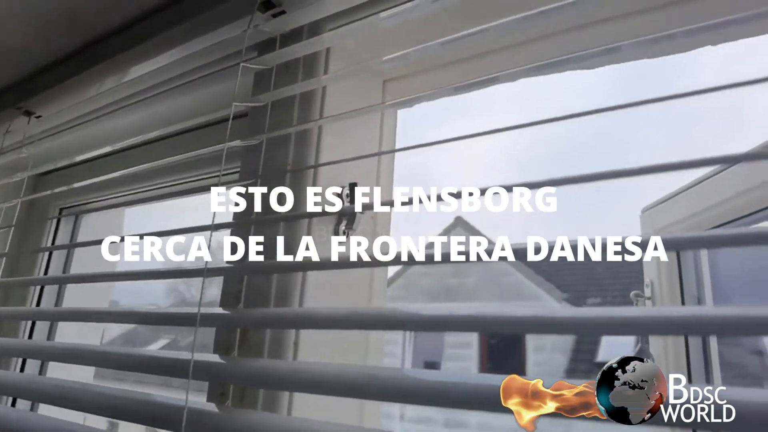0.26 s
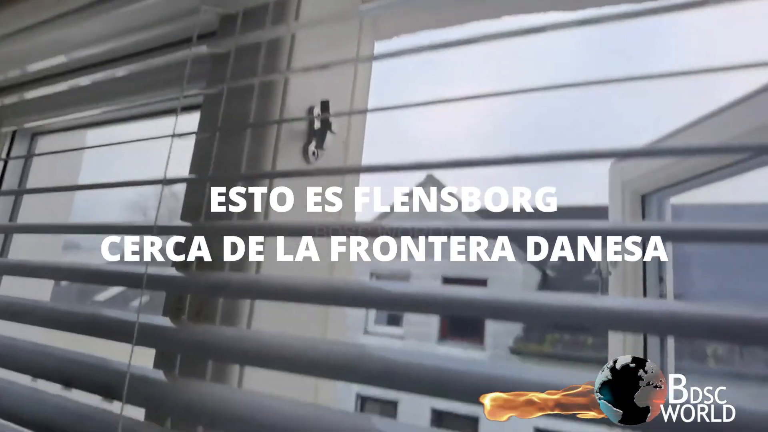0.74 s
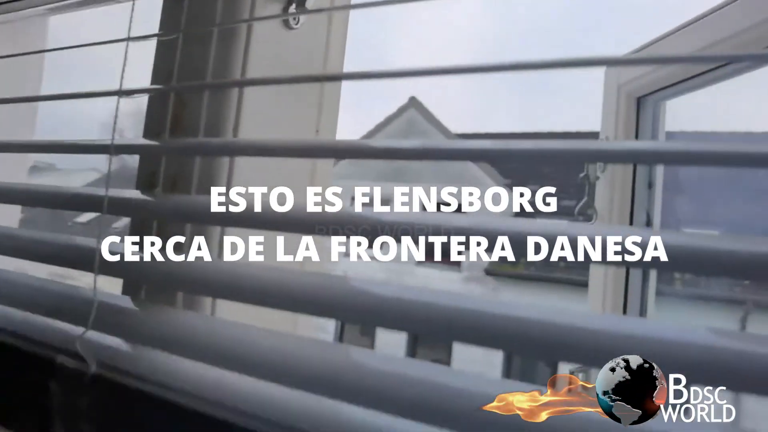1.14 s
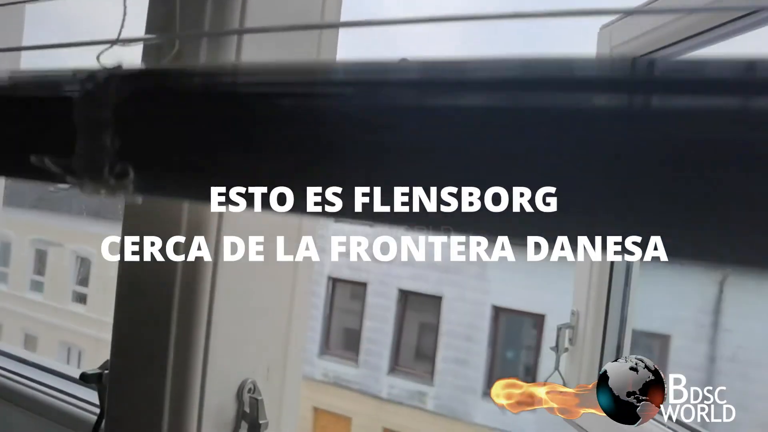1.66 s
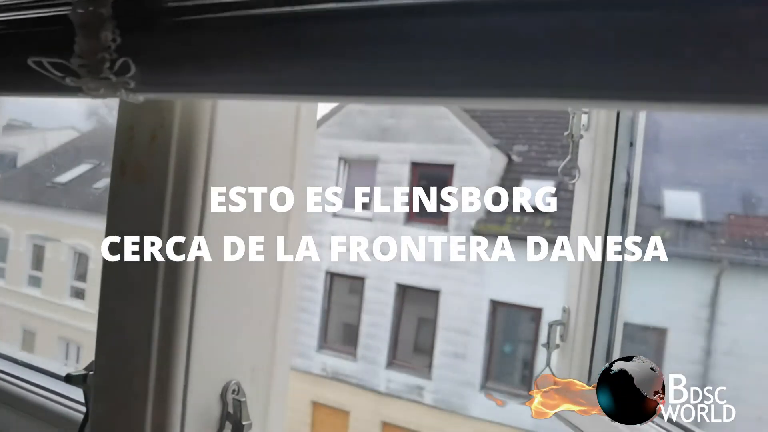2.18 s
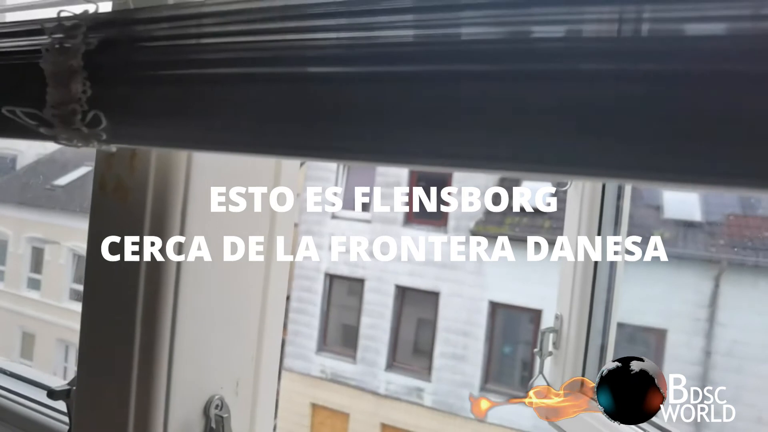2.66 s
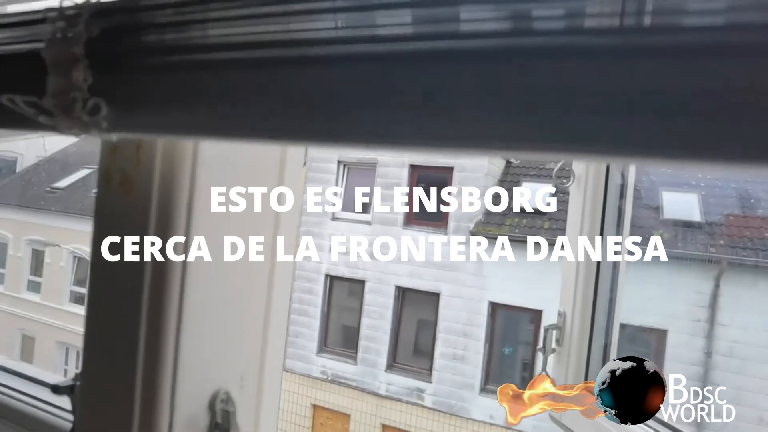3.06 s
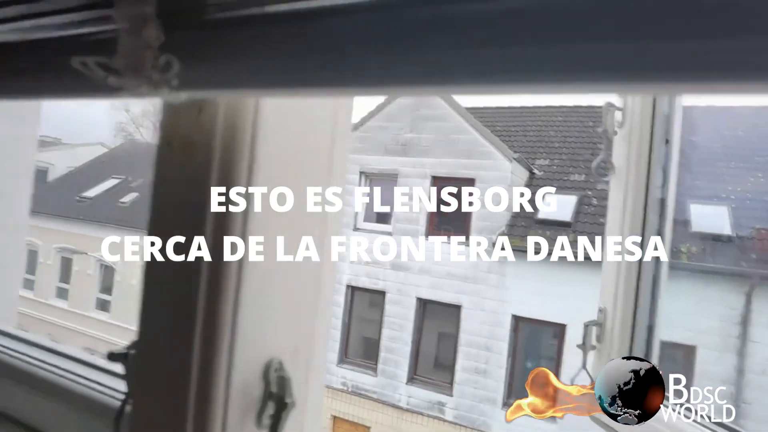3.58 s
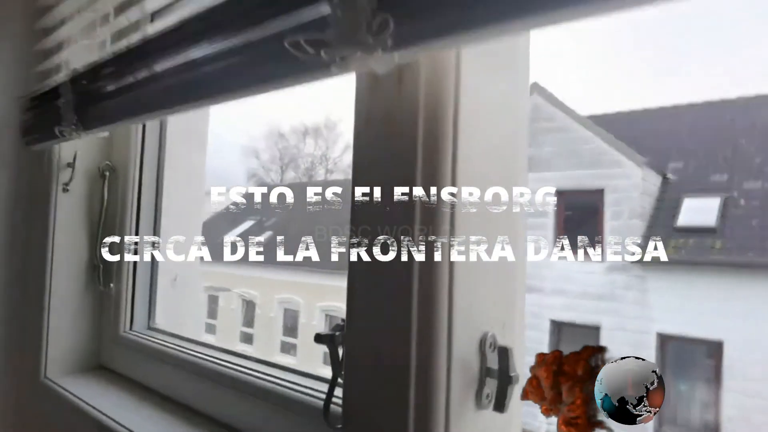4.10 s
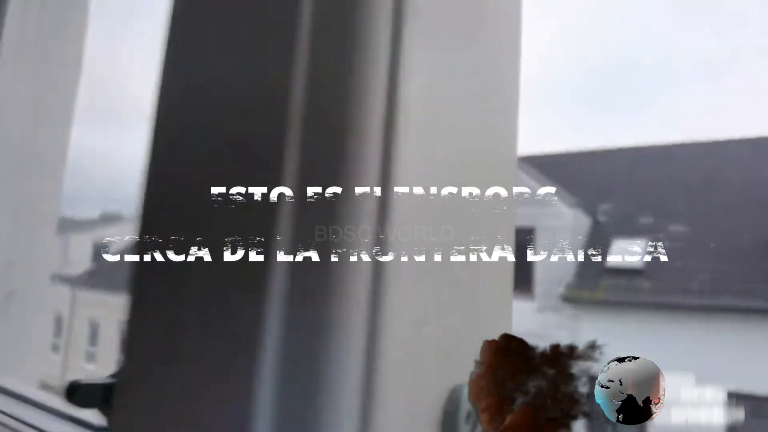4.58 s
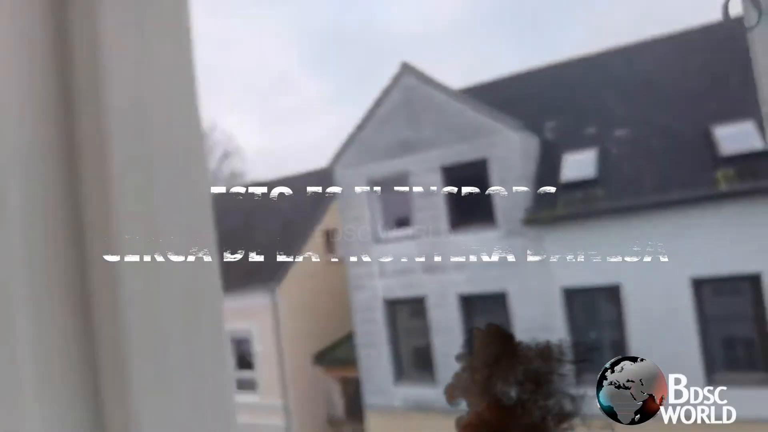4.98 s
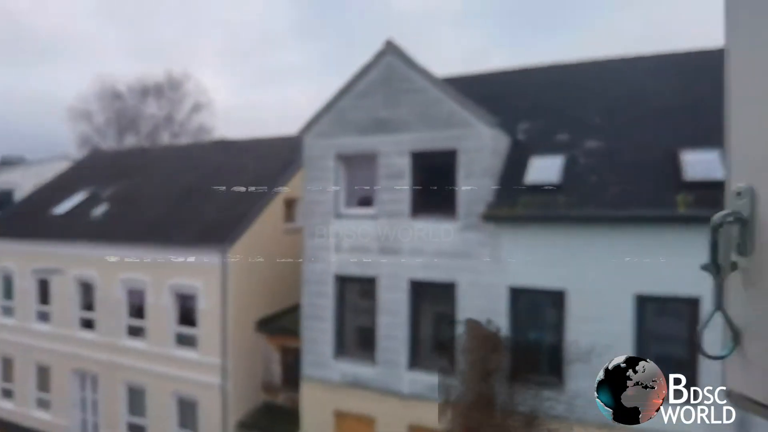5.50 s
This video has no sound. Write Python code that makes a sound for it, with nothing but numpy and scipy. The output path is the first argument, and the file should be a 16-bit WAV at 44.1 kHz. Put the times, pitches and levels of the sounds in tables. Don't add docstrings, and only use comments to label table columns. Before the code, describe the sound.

Inside a room, close to a window, a small stereo microphone with faint hiss picks up a low, deep drone of traffic and an idling motor outside. At about 0.1 s the blind's slat pack is taken up with a soft knock; a rough jolt at 0.35 s starts the pull. Until about 1.7 s the cord hisses brightly while thin slats rustle, tick and clack, with faint squeaks. From 1.75 to 1.9 s the rail clatters home in a tight cluster of sharp, bright hits with short squeaks. From 2.2 to 2.9 s a rapid roll of dull, boxy thuds, around 230 to 360 Hz, rings a wall panel, slightly right. Then mostly hum, with faint ticks near 3.1, 3.6 and 4 s and a light cord brush. Knocks on the frame come at 5.1 and, hardest with a latch snap, 5.27 s; louder thuds and a sill tap close from 5.6 s.

```python
import sys
import numpy as np
from scipy import signal
from scipy.fft import rfft, irfft
from scipy.io import wavfile
from scipy.ndimage import uniform_filter1d

SR = 44100
rng = np.random.default_rng(int(sys.argv[2]) if len(sys.argv) > 2 else 0)


def bounce(signal):
    frames = np.transpose(np.atleast_2d(signal))
    limited = np.clip(frames, -1, 1)
    pcm = np.round(limited * 32767).astype(np.int16)
    wavfile.write(sys.argv[1], SR, pcm)


def ratio_of_db(decibels):
    return 10 ** (np.asarray(decibels, float) / 20)


N = 253420


def rms_one(x):
    return x / np.sqrt(np.mean(x ** 2) + 1e-20)


def peak_one(x):
    return x / np.abs(x.mean(axis=0)).max()


def in_time(rows, outside_db=-120):
    s, *columns = np.transpose(rows)
    return np.array([np.interp(np.arange(N) / SR, s, c, outside_db, outside_db) for c in columns])


def swell(peak, rise, fall):
    late = np.arange(N) / SR - peak
    return ratio_of_db(-20 * np.maximum(late / fall, -late / rise))


def drift(rate):
    r = np.exp(-80 * np.pi * rate / SR)
    slow = signal.lfilter([1], [1, -2 * r, r * r], rng.standard_normal(N // 40 + 2002))[2000:]
    return np.interp(np.arange(N) / 40, np.arange(len(slow)), rms_one(slow))


def resonance(x, hz, width):
    r = np.exp(-np.pi * width / SR)
    zeros = np.array([1, 0, -1]) * (1 - r * r) / 2
    return signal.lfilter(zeros, [1, -2 * r * np.cos(2 * np.pi * hz / SR), r * r], x)


def twice(x, hz, width):
    return resonance(resonance(x, hz, width), hz, 3 * width)


def colour(x, spectrum):
    hz, db = np.transpose(spectrum)
    grid = np.maximum(np.fft.rfftfreq(4096, 1 / SR), 1)
    cepstrum = irfft(np.log(ratio_of_db(np.interp(np.log(grid), np.log(hz), db))))
    cepstrum[1:2048] *= 2
    cepstrum[2049:] = 0
    response = irfft(np.exp(rfft(cepstrum)))
    return signal.oaconvolve(x, response[None], axes=-1)[:, :N]


def dying_noise(t60, seconds, onset=0.00027):
    t = np.arange(int(seconds * SR)) / SR
    noise = rng.standard_normal((2, int(SR / 2)))[:, :len(t)]
    return noise * ratio_of_db(-60 * t / t60) * (1 - np.exp(-t / onset))


def add(out, sound, s):
    i = round(s * SR)
    out[:, i:i + sound.shape[1]] += sound[:, :N - i]


def room(x, t60, cut_hz):
    tail = signal.lfilter(*signal.butter(1, cut_hz, fs=SR), dying_noise(t60, .5, onset=0.00053))
    return signal.oaconvolve(x, tail / np.sqrt(np.sum(tail ** 2) / 2), axes=-1)[:, :N]


def grains(per_s, spread_db, clump_db, t60):
    energy = ratio_of_db(2 * spread_db * np.minimum(rng.exponential(1, N), 5)) * (rng.random(N) < per_s / SR)
    fall = ratio_of_db(-120 / (t60 * SR))
    clumps = ratio_of_db(clump_db * (.5 * drift(10) + drift(45)))
    return clumps * np.sqrt(signal.lfilter([1], [1, -fall], energy + 1e-9)) * rng.standard_normal((2, N))


def patchy(x, low_hz, high_hz, patchy_db, rate):
    edges = np.geomspace(low_hz, high_hz, num=8)
    bands = [signal.sosfilt(signal.butter(2, e, "band", fs=SR, output="sos"), x) for e in zip(edges, edges[1:])]
    return sum((-1) ** k * ratio_of_db(patchy_db * drift(rate)) * band for k, band in enumerate(bands))


# t/s, level/dB
HISS_LEVEL = [(0, -45), (.3, -37.5), (1.9, -40.5), (2.12, -53.5), (2.3, -50.5), (4.7, -48.5), (5.45, -50),
              (5.75, -54.5)]
# f/Hz, level/dB per Hz
HISS_COLOUR = [(600, -30), (1000, -9), (2200, -12), (3000, -11), (4200, -18), (5500, -12.5), (6650, -5),
               (7550, -9), (9550, -2), (10700, -5), (11600, -17), (12800, -12), (14200, -17)]
# f/Hz, width/Hz, level/dB
WHISTLES = [(6500, 40, -4), (6790, 30, 0), (8800, 40, -2), (9090, 30, 0), (9350, 60, 0), (10300, 40, -3),
            (10800, 40, -3), (12700, 60, -8)]


def hiss():
    white = rng.standard_normal((2, N))
    whistles = sum(ratio_of_db(db + 3.5 * drift(1.5)) * rms_one(resonance(white, hz, width))
                   for hz, width, db in WHISTLES)
    body = patchy(colour(white, HISS_COLOUR), 500, 16000, patchy_db=1.5, rate=2)
    return ratio_of_db(in_time(HISS_LEVEL)[0]) * (rms_one(body) + ratio_of_db(-17) * whistles)


# t/s,
# level/dB
MOTOR = [(0.0, -73), (0.13, -33), (0.69, -38), (0.74, -52), (1.2, -27.5), (1.71, -36.5), (1.9, -56),
         (2.05, -38), (3.39, -35.5), (3.57, -53), (3.62, -40), (3.98, -41.5), (4.05, -68), (4.11, -40.5),
         (5.49, -27), (5.75, -32.5)]
# t/s, level/dB
TRAFFIC = [(0.0, -40.5), (0.05, -41), (0.69, -36), (0.74, -38.5), (1.17, -37.5), (1.7, -42.5), (1.84, -57),
           (2.21, -40), (3.15, -37.5), (3.22, -39), (3.44, -39), (3.66, -39.5), (3.71, -36.5), (3.78, -42),
           (5.54, -39.5), (5.75, -46)]
# f/Hz, width/Hz, level/dB
LOW_MODES = [(44.5, 8, -6), (45, 23.3, 19), (86, 8.1, -29)]
UPPER_MODES = [(133, 13, 1), (147, 4.4, 8), (183, 24, -16.5)]
# f/Hz, level/dB per Hz
RUMBLE = [(100, -22.5), (170, 2.5), (198, -0.5), (380, -7), (487, -18), (598, -21.5), (992, -27.5),
          (1180, -35.5), (2000, -36.5), (2600, -69), (4400, -120)]


def street():
    drone_db = in_time(MOTOR, outside_db=None)[0]
    upper_db = in_time(TRAFFIC, outside_db=None)[0]
    low_db = upper_db + 2.5
    rumble_db = -45 + upper_db - upper_db.mean()
    mid, side = rng.standard_normal((2, 4, N + SR))
    low, drone, upper, rumble = mid[:, None] + 0.2 * side[:, None] * [[1], [-1]]
    low = sum(ratio_of_db(db) * twice(low, hz, width) for hz, width, db in LOW_MODES)[:, SR:]
    drone = twice(drone, 66.46, 3.55)[:, SR:]
    drone = drone / np.sqrt(uniform_filter1d(np.mean(drone ** 2, axis=0), size=SR // 5))
    upper = sum(ratio_of_db(db) * twice(upper, hz, width) for hz, width, db in UPPER_MODES)[:, SR:]
    diffuse = 1.17 * np.gradient(rng.standard_normal((2, N)), axis=1) * 9
    rumble = colour(rumble[:, SR:] + diffuse, RUMBLE)
    return (ratio_of_db(low_db) * rms_one(low) + ratio_of_db(drone_db) * drone
            + ratio_of_db(upper_db) * rms_one(upper) + ratio_of_db(rumble_db) * rms_one(rumble))


# peak t/s, peak level/dB, f/Hz
THUDS = [(2.231, -15, 330), (2.265, -23.5, 327), (2.293, -22, 250), (2.309, -29, 295), (2.336, -16, 338.6),
         (2.361, -21, 317), (2.372, -19.5, 323), (2.415, -19.5, 313), (2.435, -14.5, 310),
         (2.456, -30, 275), (2.475, -21.5, 357), (2.495, -21, 367), (2.542, -15.5, 330), (2.557, -18, 325),
         (2.578, -19, 320), (2.621, -20.5, 276), (2.662, -17, 308), (2.68, -22, 275), (2.696, -19.5, 320),
         (2.708, -25, 279), (2.724, -20, 241.6), (2.772, -17, 360), (2.791, -19, 290), (2.806, -18.5, 276),
         (2.835, -28.5, 235), (2.847, -31, 270), (2.873, -21.5, 240), (2.909, -25, 313), (5.591, -10, 225),
         (5.613, -14.5, 260), (5.626, -15, 290), (5.64, -20, 267), (5.651, -19, 272), (5.666, -13.5, 267),
         (5.679, -24, 235), (5.705, -11, 274), (5.715, -17.5, 266), (5.727, -15, 300), (5.74, -14, 317)]


def thuds():
    out = np.zeros((1, N))
    t = np.arange(int(.05 * SR)) / SR
    peak_s, swell_s = .015, 0.0036
    shape = np.exp(-.5 * ((t - peak_s) / swell_s) ** 2)
    for (s, db, hz), (low, mid) in zip(THUDS, rng.random((len(THUDS), 2))):
        partials = np.cos(2 * np.pi * hz * (t - t[len(t) * 3 // 10]))
        partials = partials + 0.38 * np.sin(2 * np.pi * (170 + 40 * low) * t)
        partials = partials + 0.25 * np.sin(2 * np.pi * (400 + 80 * mid) * t)
        add(out, ratio_of_db(db) * (shape * partials)[None], s - peak_s)
    buzz = 0.37 * out * np.abs(out) / np.abs(out).max()
    boom = room(out + buzz, 0.8, cut_hz=1540)
    both = out + ratio_of_db(-11.5) * (boom.mean(axis=0) + 0.033 * (boom[0] - boom[1]) * [[1], [-1]])
    both = both + ratio_of_db(3.0) * twice(twice(boom, 870, 400), 940, 640)
    brightness = ratio_of_db(13.5) * swell(2.72, 0.6, 0.45)
    both = both + brightness * twice(twice(boom, 603, 150), 600, 190)
    return np.array([np.roll(both[0], shift=7), both[1]]) * ratio_of_db([[-.6], [.6]])


# f/Hz, width/Hz, level/dB
FRAME_MODES = [(1470, 130, -2), (1670, 110, 1.5), (2010, 130, -6), (2340, 150, -3), (3030, 200, -10.5),
               (4700, 300, -17)]
SILL_MODES = [(1495, 90, -2), (1725, 140, 1), (1975, 100, -4), (2550, 130, -7), (3440, 160, -16)]
PACK_MODES = [(1460, 150, 0), (2230, 130, -6), (2560, 90, -11), (2940, 90, -12), (3340, 90, -16)]
LATCH_MODES = [(5550, 350, -7), (6200, 350, -8), (7160, 380, -2), (8570, 330, 2)]
# t/s, body peak level/dB, broad part level/dB, latch level/dB, t60/s
FRAME_KNOCKS = [
    (5.098, -35.5, -18, -36, 0.023),
    (5.265, -24, -11, -27, 0.051),
    (5.2715, -11, -2, -4, 0.074),
    (5.289, -17.5, 4, -31, 0.11),
    (5.303, -41, 9, -29, 0.044),
    (5.411, -38.5, -8, -38, 0.062),
    (5.584, -33.5, 2, -50, 0.012),
]
SILL_KNOCKS = [
    (5.661, -16, -22, -34, 0.038),
]
PACK_KNOCKS = [
    (0.104, -12, -33, -24.5, 0.03),
    (0.12, -23, -9, -42, 0.043),
    (0.345, -10, 2.5, -39, 0.057),
]


def knocks(rows, modes, lag):
    broad_colour = [(1250, -40), (1450, 0), (3100, -3), (3900, -22), (10000, -28), (13000, -80)]
    latch_colour = [(3000, -21.5), (5000, -4.5), (9000, -1.5), (10500, -20), (13500, -24), (14500, -46)]
    out = np.zeros((2, N))
    t = np.arange(int(.2 * SR)) / SR
    for s, body_db, broad_db, latch_db, t60 in rows:
        rise_s = 0.00069 + 0.057 * t60
        contact = dying_noise(t60, .2) * np.minimum(t / rise_s, 1) ** 2
        contact = contact + 0.24 * contact[::-1]
        ringing = sum(ratio_of_db(db) * rms_one(twice(contact, hz, width)) for hz, width, db in modes)
        broad = colour(contact, broad_colour)[:, :len(t)]
        body = peak_one(ringing) + ratio_of_db(broad_db) * peak_one(broad)
        quick = contact * ratio_of_db(-700 * t)
        latch = sum(ratio_of_db(db) * rms_one(twice(quick, hz, width)) for hz, width, db in LATCH_MODES)
        latch = latch + ratio_of_db(5.0) * rms_one(colour(quick, latch_colour)[:, :len(t)])
        add(out, ratio_of_db(body_db) * peak_one(body) + ratio_of_db(latch_db) * peak_one(latch), s)
    return np.array([out[0], np.roll(out[1], shift=lag)])


# start t/s, end t/s, f/Hz,
# width/Hz, level/dB
SQUEAKS = [(1.18, 1.26, 1080, 40, -40), (1.32, 1.4, 1075, 45, -45), (1.08, 1.17, 1060, 50, -49),
           (5.272, 5.37, 650, 450, -46), (0.5, 0.62, 1075, 60, -54), (1.803, 1.826, 9500, 120, -21),
           (1.874, 1.904, 9480, 60, -17), (1.831, 1.855, 5150, 120, -27), (1.872, 1.905, 10700, 300, -31),
           (1.751, 1.775, 800, 180, -28), (1.88, 1.92, 1080, 150, -32), (1.872, 1.9, 750, 350, -36),
           (1.91, 1.93, 1500, 400, -32), (1.595, 1.625, 720, 200, -40), (1.655, 1.69, 650, 200, -42),
           (1.89, 2.0, 650, 300, -39), (5.1, 5.122, 1690, 150, -41), (5.15, 5.165, 1650, 200, -55),
           (3.982, 4.032, 6850, 120, -42), (4.03, 4.09, 6850, 120, -48), (3.982, 3.996, 5900, 150, -43),
           (4.0, 4.045, 6050, 250, -47), (2.465, 2.5, 5700, 300, -45), (2.508, 2.524, 5850, 200, -41),
           (2.505, 2.535, 8600, 1500, -50)]


def squeaks():
    out = np.zeros((2, N))
    for start, end, hz, width, db in SQUEAKS:
        mid, side = twice(rng.standard_normal((2, SR // 2)), hz, width)
        steady = mid / (np.abs(signal.hilbert(mid)) + .5 * mid.std())
        tone = steady + .4 * rms_one(side) * [[1], [-1]]
        phase = np.linspace(0, 1, int((end - start) * SR))
        envelope = np.sqrt(np.minimum(1, np.minimum(12 * phase, 3 * (1 - phase))))
        settled = rms_one(tone)[:, SR // 4:][:, :len(phase)]
        add(out, ratio_of_db(db) * settled * envelope, start)
    return out


# t/s, body peak level/dB, body f/Hz, edge f/Hz, edge level/dB
CLACKS = [(0.105, -34, 2210, 5940, -31), (0.257, -41, 2550, 6500, -31.5), (0.344, -4.5, 2590, 7230, -8),
          (0.408, -31, 1470, 8750, -20), (0.49, -25, 2070, 10000, -29), (0.656, -34, 2260, 8800, -15.5),
          (1.321, -25, 1500, 9700, -17), (1.505, -27, 1340, 7340, -23), (1.545, -20, 3160, 9100, -16),
          (1.6095, -24, 2650, 8500, -20), (1.6205, -37, 2320, 9040, -8.5), (1.6485, -27, 2960, 5760, -23),
          (1.649, -31, 2000, 9000, -21), (1.6945, -40, 3320, 9250, -18)]
CLATTER = [(1.7495, -17.5, 795, 5040, -26), (1.7515, -5.5, 2520, 6960, -9), (1.7905, -20, 1900, 7000, -18),
           (1.793, -14, 2080, 9400, -9.5), (1.8025, -28, 1700, 4950, -7.5), (1.805, -31, 1950, 7500, -20),
           (1.813, -16, 1900, 6100, -20), (1.8205, -8, 2440, 7500, -28), (1.8295, -11, 2000, 9050, -7),
           (1.8305, -8.5, 1890, 5240, -7.5), (1.835, -14, 1950, 5600, -16), (1.8685, -18, 2400, 7000, -22),
           (1.8715, -4, 2000, 9400, -7.5), (1.8735, -25, 3040, 7100, -33), (1.8995, -14.5, 1140, 7340, -19),
           (1.9015, -22, 1890, 5100, -12), (1.909, -19, 1490, 9500, -32)]
TICKS = [
    (2.489, -25, 880, 5450, -39),
    (2.511, -43, 1120, 9000, -31.5),
    (3.096, -32.5, 900, 5500, -42),
    (3.226, -59, 962.5, 8300, -42),
    (3.606, -35, 2960, 9500, -31),
    (3.732, -35.5, 1030, 8900, -49),
    (3.985, -58, 776, 6700, -32),
]
# t/s, peak level/dB, edge f/Hz
RATCHET = [
    (0.7585, -10, 8500),
    (0.8109, -11, 8300),
    (1.0538, -23, 9720),
    (1.2514, -8, 9800),
    (1.2715, -10, 8650),
    (1.42, -16, 8770),
    (1.4704, -19, 8520),
    (1.5744, -7, 8580),
]
# f/Hz, level/dB
PORT = [(300, -3.5), (700, 4.5), (1300, -2), (3000, -7), (3900, -6), (5200, 0), (10500, -2), (12000, -7),
        (15500, -27)]


def clacks():
    out = np.zeros((2, N))
    small = [(s, db - 13, 2200, hz, db - 10.5) for s, db, hz in RATCHET]
    # contacts, t60 (s), width of the body bump (Hz)
    kinds = [(CLACKS, 0.018, 400), (CLATTER, 0.016, 520), (TICKS, 0.016, 280), (small, 0.012, 900)]
    contacts = [(*row, t60, width) for rows, t60, width in kinds for row in rows]
    for s, body_db, body_hz, edge_hz, edge_db, t60, width in contacts:
        crackle = dying_noise(np.clip(t60, .008, .3), .1, onset=0.0015)
        near = crackle + 0.5 * crackle[::-1]
        near = np.array([np.roll(near[0], shift=12), near[1]])
        body = twice(near, body_hz, width) + 0.42 * twice(near, 2420, 1430)
        alike = crackle[0] + crackle[1] + 0.6 * (crackle[0] - crackle[1]) * [[1], [-1]]
        edge = twice(alike, edge_hz, 1370) + 0.63 * twice(alike, 8100, 5400) + 0.34 * twice(alike, 12600, 3800)
        add(out, ratio_of_db(body_db) * peak_one(body) + ratio_of_db(edge_db + 7.5) * peak_one(edge), s)
    return colour(out, PORT)


# t/s, level/dB
PULL = [(0.2, -49), (0.304, -33), (0.376, -28), (0.416, -25.5), (0.5, -24), (0.634, -26), (0.658, -21.5),
        (0.684, -27), (0.916, -28.5), (1.228, -24.5), (1.268, -24.5), (1.312, -28.5), (1.434, -28.5),
        (1.59, -23), (1.612, -29), (1.64, -32), (1.74, -29), (1.78, -29)]
# peak t/s, swell/s, fade/s, slat rustle level/dB, brushing level/dB
STIR = [
    (1.831, 0.075, 0.0088, -26.5, -17.5),
    (1.878, 0.018, 0.11, -27.5, -22),
    (2.496, 0.12, 0.017, -45, -43),
    (3.231, 0.011, 0.012, -54.5, -43.5),
    (3.612, 0.0015, 0.06, -43, -38),
    (3.879, 0.04, 0.26, -56, -44.5),
    (4.0, 0.072, 0.068, -76, -36.5),
    (5.593, 0.29, 0.06, -54.5, -48.5),
]
# f/Hz, width/Hz, level/dB
SLAT_MODES = [(1097, 30, 0), (1414, 91, -2), (2000, 23, -4), (2273, 190, -13), (2640, 40, -12),
              (2960, 60, -2.5), (3276, 45, 6), (5870, 77, -21), (8750, 144, 11), (10000, 59, -10)]
# f/Hz, level/dB per Hz
RUSTLE = [(450, -21.5), (700, -18.5), (1250, -34.5), (1450, -5.5), (1750, -9.5), (2100, -3.5), (3000, -6),
          (3400, -11), (3700, -11.5), (4200, -15), (4600, 0), (6000, -59.5)]
CORD = [(2240, -75), (3800, -15), (4920, -12), (5320, -4.5), (5880, -3), (6460, -5), (8470, -2), (9190, -3),
        (10100, 0.5), (12200, -12.5), (15500, -13)]
BRUSH = [(2060, -26), (3500, -17.5), (4910, -5.5), (5910, 3), (6420, -0.5), (6890, 3.5), (7450, -1.5),
         (9620, -4), (14500, -26)]


def blind():
    cord_db = in_time(PULL)[0]
    moving = np.arange(N) / SR - 0.27
    rustle_db = cord_db - 10 - 0.5 * moving + 300 * np.minimum(moving, 0)
    stir, brush = sum(ratio_of_db([[slat_db], [brush_db]]) * swell(*times) for *times, slat_db, brush_db in STIR)
    rubbing = grains(1500, spread_db=2.5, clump_db=2.2, t60=0.015)
    rubbing = np.array([rubbing[0] + 0.34 * np.roll(rubbing[1], shift=6), 1.05 * rubbing[1]])
    ringing = sum(ratio_of_db(db + 5 * drift(8)) * resonance(rubbing, hz, width) for hz, width, db in SLAT_MODES)
    slats = patchy(colour(rubbing, RUSTLE), 500, 4600, patchy_db=1.2, rate=20)
    slats = rms_one(slats) + ratio_of_db(-1.0) * rms_one(ringing)
    fibres = grains(2500, spread_db=2, clump_db=1.5, t60=0.014)
    cord = patchy(colour(fibres, CORD), 3800, 15800, patchy_db=1.4, rate=25)
    brushing = brush * rms_one(colour(fibres, BRUSH))
    return (ratio_of_db(rustle_db) + stir) * slats + ratio_of_db(cord_db) * rms_one(cord) + brushing


def scene():
    rubbing, blows, rings = blind(), clacks(), squeaks()
    pack = knocks(PACK_KNOCKS, PACK_MODES, lag=-10)
    by_window = knocks(FRAME_KNOCKS, FRAME_MODES, lag=16) + knocks(SILL_KNOCKS, SILL_MODES, lag=16)
    by_window = by_window * ratio_of_db([[1.5], [-1.5]])
    little_sent = ratio_of_db(-22) * (pack + rings)
    reverb = room(ratio_of_db(-2.5) * rubbing + ratio_of_db(-11.0) * blows + little_sent, 0.43, cut_hz=6200)
    near = rubbing + blows + rings + pack + reverb
    near = near + by_window + ratio_of_db(-7.0) * room(by_window, 0.23, cut_hz=4000)
    far = signal.sosfilt(signal.butter(4, 35, "high", fs=SR, output="sos"), thuds() + street())
    return near + far + hiss()


def band_limit(x):
    return signal.sosfilt(signal.butter(12, 15680, fs=SR, output="sos"), x)


# start t/s, end t/s, share of gaps 0-1
MERGED = [
    (0.12, 0.27, .0),
    (0.41, 1.46, .15),
    (1.64, 1.74, .08),
    (1.78, 1.9, .45),
]
# f/Hz, level/dB against the usual level of the band
AUDIBLE = [(1800, -14), (2600, -9), (3100, -9), (3800, -5.5), (4700, -7), (5500, -13), (10800, -13),
           (11500, -7), (13300, -8), (13900, 2), (15500, 8)]


def record(dry):
    x = 1.094 * np.tanh(dry / 1.047)
    hz, t, (mid, side) = signal.stft(np.array([x[0] + x[1], x[0] - x[1]]) / 2, SR, nperseg=2048)
    chance = rng.random((len(hz) // 16 + 1, len(t))).repeat(16, axis=0)[:len(hz)]
    for start, end, gaps in MERGED:
        side = side * ~((hz[:, None] > 4600) & (t > start) & (t < end) & (chance > gaps))
    cells = np.array([mid, side])
    bands = np.add.reduceat(np.abs(cells) ** 2, np.arange(0, len(hz), 4), axis=1)
    bands = bands.repeat(4, axis=1)[:, :len(hz)] / 4
    usual = np.median(bands, axis=2, keepdims=True)
    limit = usual * ratio_of_db(np.interp(hz, *np.transpose(AUDIBLE), left=-60))[:, None] ** 2
    masked = ratio_of_db(-52) ** 2 * bands[0, hz > 1000].sum(axis=0) * (hz[:, None] > 11300)
    heard = cells * (bands > limit + masked)
    mid, side = signal.istft(heard, SR, nperseg=2048)[1][:, :N]
    return band_limit(np.array([mid + side, mid - side]))


dry = scene()
out = record(dry)
bounce(out)
```